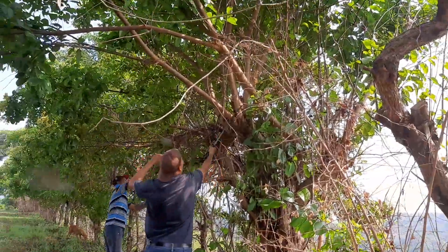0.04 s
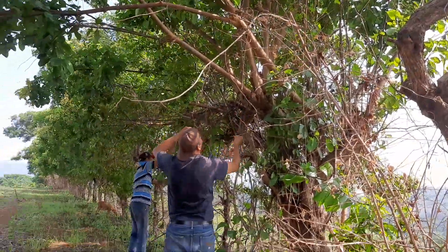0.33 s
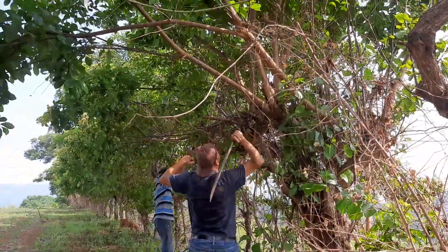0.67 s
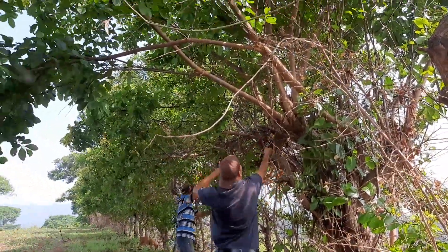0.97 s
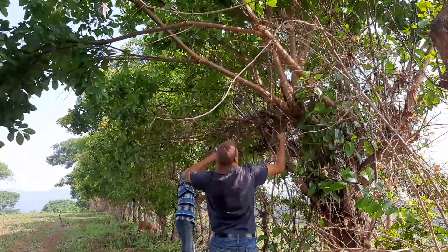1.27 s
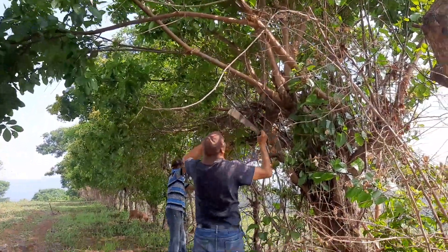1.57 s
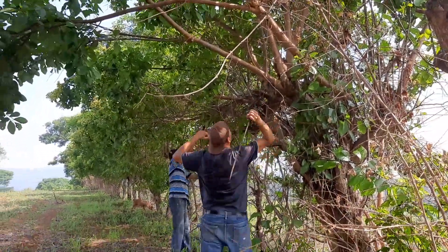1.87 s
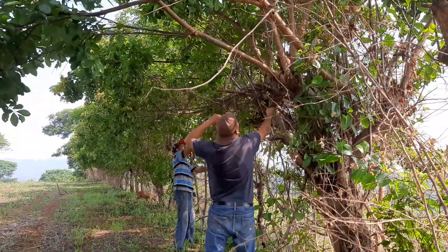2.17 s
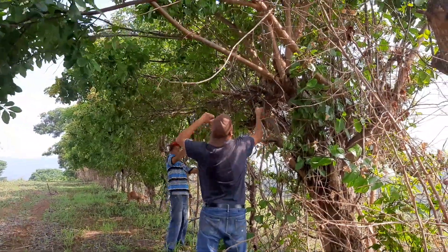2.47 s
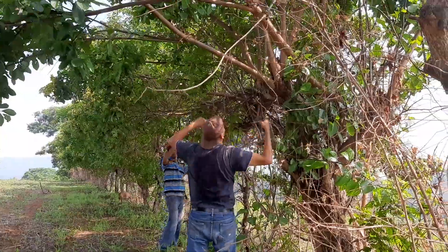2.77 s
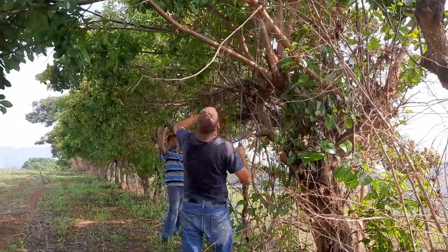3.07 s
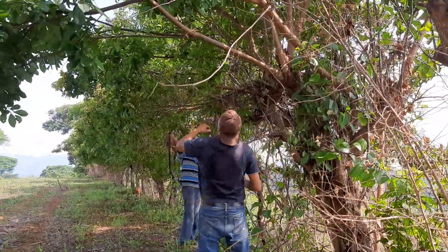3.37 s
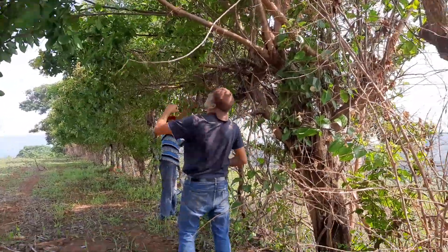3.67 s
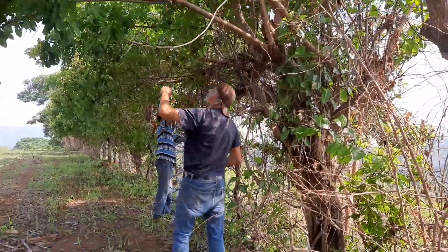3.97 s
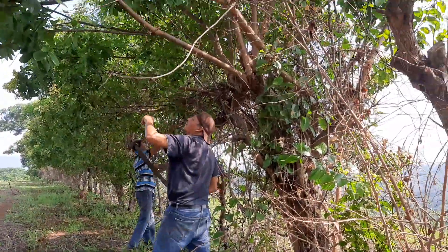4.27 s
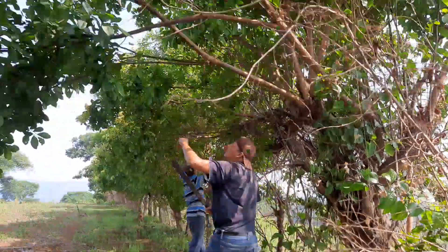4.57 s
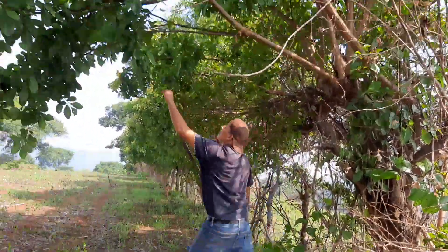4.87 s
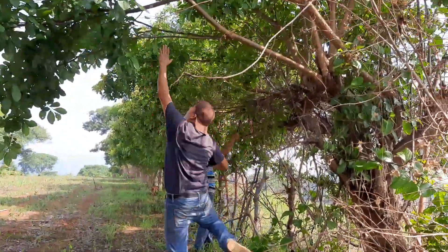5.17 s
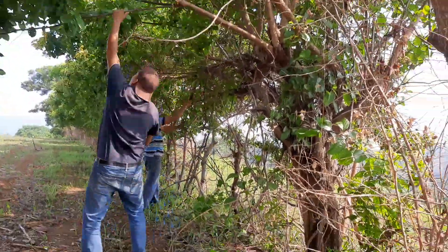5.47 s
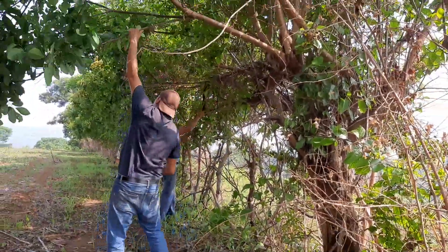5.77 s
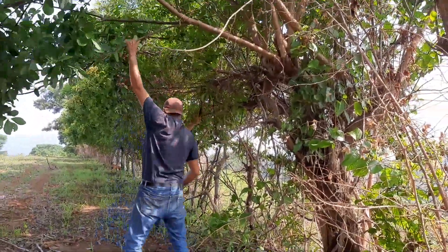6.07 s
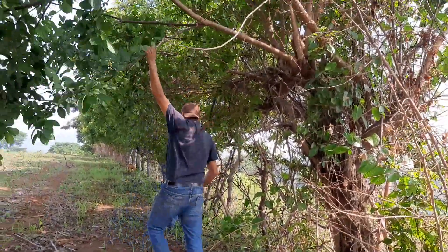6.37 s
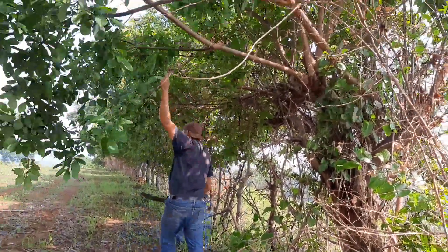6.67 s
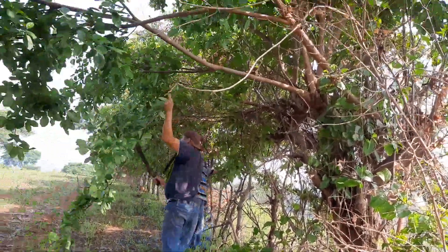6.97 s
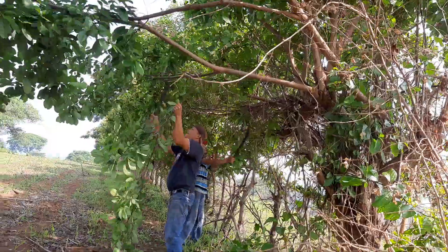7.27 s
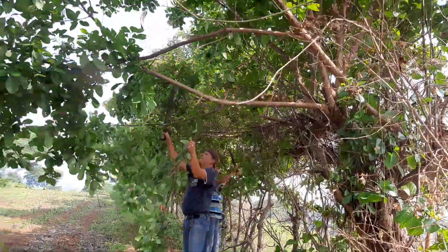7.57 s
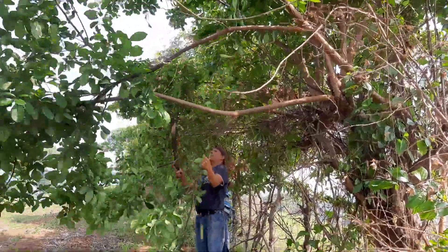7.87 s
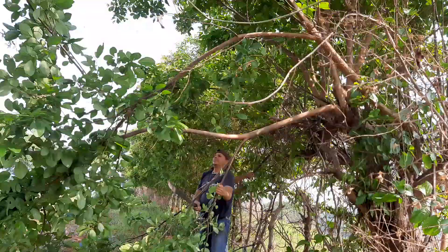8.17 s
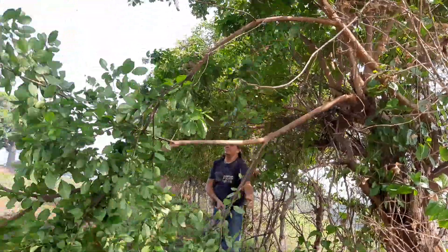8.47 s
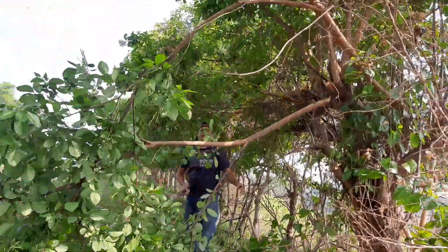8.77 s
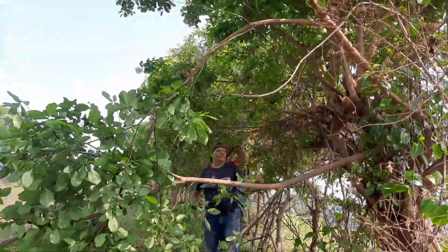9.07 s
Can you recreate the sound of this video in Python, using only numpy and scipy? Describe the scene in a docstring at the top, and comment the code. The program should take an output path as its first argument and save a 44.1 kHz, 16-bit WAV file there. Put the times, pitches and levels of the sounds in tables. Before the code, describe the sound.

A machete chops a leafy tree limb, which cracks loudly as it is pulled down amid rustling leaves and snapping twigs.

```python
"""A machete hacks a leafy limb off a tree, a few metres away, on a calm day.
Each bite splits green fibres and rings the limb and the steel. Green wood creaks; a soft crunch, as of
a step on dry litter, and a faint knock come before the limb is pulled down in a few loud cracks.
Leaves rustle by tapping one another and twigs snap throughout; light wind and a few handling knocks
reach the microphone."""
import sys
import numpy as np
from scipy import signal
from scipy.fft import rfft, irfft
from scipy.io import wavfile

SR = 44100
rng = np.random.default_rng(int(sys.argv[2]) if len(sys.argv) > 2 else 0)


def master(y):
    """Save y as 16-bit WAV."""
    cut = np.clip(np.atleast_2d(y).T, -1, 1)
    pcm = np.round(cut * 32767)  # scale
    wavfile.write(sys.argv[1], SR, pcm.astype(np.int16))


N = 407249
T = np.arange(N) / SR
AGE_S = T[:SR // 2]   # time since a contact


def from_db(db):
    """Decibels to gain."""
    return 10 ** (np.asarray(db) / 20)


def unit_rms(x):
    """Scale to rms 1."""
    return x / np.sqrt(np.mean(x ** 2) + 1e-20)


def curves(rows):
    """Interpolate each column over the times in the first."""
    times_s, *columns = np.transpose(rows)
    return [np.interp(T, times_s, column) for column in columns]


def db_at(spectrum, hz):
    """Read a spectrum on a log-frequency axis."""
    knots_hz, db = np.transpose(spectrum)
    return np.interp(np.log(hz + 1e-3), np.log(knots_hz), db)


def colour(x, *spectra):
    """Minimum-phase filter; the (freq_hz, gain_db) spectra add."""
    size = 4096
    hz = np.fft.rfftfreq(size, 1 / SR)
    cepstrum = irfft(np.log(from_db(sum(db_at(spectrum, hz) for spectrum in spectra))))
    cepstrum[1:size // 2] *= 2
    cepstrum[size // 2 + 1:] = 0
    response = irfft(np.exp(rfft(cepstrum)))
    return signal.fftconvolve(np.atleast_2d(x), response[None], axes=-1)[:, :x.shape[-1]]


def resonance(hz, gain_db, width_ratio):
    """Spectrum with one peak."""
    return [(hz / width_ratio, 0), (hz, gain_db), (hz * width_ratio, 0)]


def drift(rate_hz):
    """Random wavering, rms 1."""
    knots = rng.standard_normal(N // 40)
    return unit_rms(np.interp(T * rate_hz, np.arange(len(knots)), knots))


def panned(x, pan_db):
    """Constant-power pan; pan_db is left minus right."""
    sides = np.array([from_db(pan_db / 2), from_db(-pan_db / 2)]).reshape(2, -1)
    return x * sides / np.sqrt(np.mean(sides ** 2, axis=0))


def add(out, start_s, sound):
    """Mix a sound into out."""
    i = round(start_s * SR)
    out[:, i:i + sound.shape[-1]] += sound[:, :N - i]


def swell(peak_s, db, rise_s, fall_s):
    """Power envelope: Gaussian rise, exponential fall."""
    late_s = T - peak_s
    decay = np.where(late_s < 0, (late_s / rise_s) ** 2, late_s / fall_s)
    return from_db(db) ** 2 * np.exp(-2 * np.minimum(decay, 20))


def grove(x, pan_db, wet_db):
    """Trunks and ground scatter sound back at once; the crowns return a faint, longer wash."""
    early_t60_s, late_db, late_t60_s = .1, -20, .35
    fade = from_db(-60 * AGE_S / early_t60_s) + from_db(late_db - 60 * AGE_S / late_t60_s)
    onset = 1 - np.exp(-(AGE_S / .00059) ** 2)
    mid, side = rng.standard_normal((2, len(AGE_S))) * from_db(wet_db) * fade * onset
    side = colour(side, [(200, -10.5), (900, -5.5), (2500, 6)])   # long waves reach both ports alike
    echo = signal.fftconvolve(np.atleast_2d(x), mid + side * [[1], [-1]], axes=-1)[:, :x.shape[-1]]
    return panned(x + echo, pan_db)


# Limb sway: time_s, relative_hiss_db
SWAY = [(0.0, -46.5), (0.5, -61), (0.8, -52.5), (1.16, -52), (1.67, -54), (2.11, -52.5), (3.3, -57),
        (3.5, -60), (3.85, -58.5), (4.24, -59), (4.81, -49), (5.24, -60), (5.5, -49.5), (5.63, -48),
        (6.35, -50), (6.79, -41), (7.15, -38), (7.62, -43), (7.9, -37), (8.28, -33.5), (8.89, -39.5),
        (9.23, -41)]
# Sprays of leaves brushed or jerked: peak_s, hiss_db, fall_s
BRUSHES = [(0.018, -47.5, .06), (1.24, -47.5, 0.11), (2.284, -48.5, .1), (2.803, -45.5, 0.045),
           (3.192, -49, .11), (3.719, -36.5, .025), (4.813, -37.5, 0.037), (4.885, -45, 0.049),
           (5.25, -47, 0.05), (5.49, -39.5, 0.054), (5.562, -34.5, 0.069), (5.682, -35.5, .14),
           (6.009, -40, 0.071), (6.19, -42.5, 0.04), (6.44, -46, .08), (6.72, -32.5, 0.14),
           (7.235, -31, .06), (8.076, -29.5, 0.033), (8.312, -33.5, 0.22), (8.519, -32.5, 0.073)]


def leaf_level_db():
    """The swaying limb and each brush through the leaves add in power."""
    sway_db, = curves(SWAY)
    brushes = sum(swell(peak_s, db, .79 * fall_s, fall_s) for peak_s, db, fall_s in BRUSHES)
    return 10 * np.log10(from_db(sway_db + 1) ** 2 + brushes)


def contacts(per_s, spread_db):
    """Random taps: many light, few hard; rms 1."""
    sizes = from_db(spread_db * np.minimum(rng.exponential(1, N), 5)) * rng.choice([-1, 1], N)
    return unit_rms(sizes * (rng.random(N) < per_s / SR))


def rustle(spectrum, per_s, near_db, flutter_db):
    """Single leaf taps on either side over a diffuse wash from the crown."""
    taps = np.array([contacts(per_s * from_db(2 * drift(50)), spread_db=2) for side in range(2)])
    wash = rng.standard_normal((2, N))
    return unit_rms(colour(from_db(near_db) * taps + wash, spectrum)) * from_db(flutter_db * drift(70))


def stalks(per_s, q, sizes=14):
    """Stalks knock together, each size ringing briefly at its own pitch; rms 1."""
    ticks = 0
    for hz in np.geomspace(1700, 6800, sizes):
        knocks = contacts(per_s / sizes, spread_db=1) + 1e-18
        ticks = ticks + signal.lfilter(*signal.iirpeak(hz, q, fs=SR), knocks) / np.sqrt(hz)
    ticks = unit_rms(ticks)
    right_lag_s = .00021
    return np.array([ticks, np.roll(ticks, round(right_lag_s * SR))])


# Moving foliage: time_s, relative_pan_db, treble_db, relative_swish_db
FOLIAGE_MIX = [(0.4, 2.5, -3, -14.5), (0.8, 0, 4, -15.5), (4.35, 2.5, 10, -15.5), (4.6, 7, 6, -14.5),
               (6.6, 6, 2.5, -16), (7.1, 0.5, 3.5, -14), (8.15, 4, 6.5, -14.5), (8.7, 8, 3.5, -16)]
# Leaf hiss: freq_hz, density_db
LEAF_SPECTRUM = [(880, -42.5), (1500, -16.5), (2100, -6.5), (2410, -5), (2740, 0.5), (3220, 0),
                 (4460, -5.5), (5940, -4.5), (6890, -7), (8830, -17.5), (12900, -10.5), (15100, -15.5),
                 (16000, -20)]
# Twig swish: freq_hz, density_db
SWISH_SPECTRUM = [(70, -26.5), (150, -7.5), (300, -0.5), (600, -3), (850, -2.5), (1600, -5), (2200, -7),
                  (3200, -21)]


def foliage(hiss_db):
    """Leaves hiss, twigs swish, stalks tick; harder shaking brings more contacts."""
    pan_db, treble_db, swish_db = curves(FOLIAGE_MIX)
    per_s = 7000 * from_db(.7 * (hiss_db - hiss_db.max()))
    hiss = rustle(LEAF_SPECTRUM, per_s, near_db=-7, flutter_db=1.5)
    treble = signal.sosfilt(signal.butter(1, 8000, "high", fs=SR, output="sos"), hiss)
    ticks = from_db(-11) * stalks(per_s=110, q=8)
    hiss = hiss + (from_db(treble_db) - 1) * treble + ticks
    swish = rustle(SWISH_SPECTRUM, per_s, near_db=-5, flutter_db=2)
    swish = .5 * swish + 1.466 * swish[::-1]   # both ports share longer waves
    return from_db(hiss_db) * (panned(hiss, pan_db - 3) + from_db(swish_db) * swish)


# Snapping thin wood: freq_hz, density_db
TWIG_SPECTRUM = [(100, -23.5), (500, -18.5), (1200, -6), (2000, -4.5), (3000, 1), (6500, -2), (9000, -10.5),
                 (12500, -4), (16000, -7.5)]


def twiglets(hiss_db):
    """Tiny twigs snap at random, louder as the foliage moves harder."""
    snaps = colour(contacts(per_s=16, spread_db=2.5), TWIG_SPECTRUM)
    return from_db(hiss_db - 13) * unit_rms(grove(snaps, pan_db=5, wet_db=-35))


# Wind on the microphone: freq_hz, density_db
RUMBLE_SPECTRUM = [(25, -53.5), (50, -9), (90, 1.5), (130, -8), (200, -19), (1500, -81)]
# Soft buffets: peak_s, level_db
BUFFETS = [(0.18, -49), (0.64, -49), (6.69, -45), (8.23, -46)]


def wind(hiss_db, calm_db=-68, draught_db=-23):
    """Lumpy rumble from light air, the limb's draught and single buffets."""
    buffets = sum(swell(peak_s, db, rise_s=.032, fall_s=.059) for peak_s, db in BUFFETS)
    level = np.sqrt(from_db(calm_db) ** 2 + from_db(hiss_db + draught_db) ** 2 + buffets)
    lumps = from_db(3 * drift(20))
    air = rng.standard_normal(N) + .67 * rng.standard_normal((2, N))   # shared plus per port
    return level * lumps * unit_rms(colour(air, RUMBLE_SPECTRUM))


def crackle(decay_s, spread_db, rise_s):
    """A dying run of uneven clicks, as of breaking fibres; energy 1."""
    n = len(AGE_S)
    sizes = from_db(spread_db * np.repeat(rng.standard_normal(n), 16)[:n].clip(-2, 2))
    envelope = np.exp(-AGE_S / decay_s) * (1 - np.exp(-AGE_S / rise_s))
    run = rng.standard_normal(n) * sizes * envelope
    return run / np.sqrt(np.sum(run ** 2))


# Twig snaps: start_s, relative_level_db, relative_pan_db, splinter_re_snap_db, pitch_hz
TWIG_SNAPS = [(0.038, -14, 8, -23.5, 6240), (1.399, -17.5, 6, -17, 3340), (2.416, -28, 3, 8.5, 6100),
              (2.761, -22, 18, -6, 2700), (2.778, -17, 13, 0, 2300), (3.356, -19.5, 10, -7, 3200),
              (3.508, -28, 13, -5.5, 2800), (3.522, -28.5, 6, 6.5, 6000), (3.683, -28.5, 5, 16, 6800),
              (3.71, -20, -21, 11, 3500), (5.544, -14, 3, -11, 6000), (5.973, -22, 14, -2, 3000),
              (6.01, -21, 8, -6, 5000), (6.631, -3.5, 10.5, -1, 3240), (7.1945, -6.5, 11, -4, 3900),
              (7.3597, -8, 12, -10, 4200), (9.16, -13, 16, -19, 4000)]


def twigs():
    """Thin wood gives way in one sharp snap; green twigs splinter briefly after it."""
    out = np.zeros((2, N))
    for start_s, level_db, pan_db, splinter_db, pitch_hz in TWIG_SNAPS:
        snap = crackle(decay_s=.0007, spread_db=0, rise_s=.0001)
        splinters = from_db(splinter_db) * crackle(decay_s=.007, spread_db=5, rise_s=.001)
        twig = colour(snap + splinters, TWIG_SPECTRUM, resonance(pitch_hz, gain_db=5, width_ratio=1.56))
        add(out, start_s, grove(from_db(level_db + 9.5) * twig, pan_db - 9, wet_db=-34.5))
    return out


def ring(modes, force, pitch_spread, build_cycles):
    """Damped modes under a force spectrum; pitches shift with the grip, low modes build up later."""
    hz, level_db, t60_s = np.transpose(modes)[:, :, None]
    hz = hz * (1 + pitch_spread * rng.standard_normal(hz.shape))
    swing = np.sin(2 * np.pi * (hz * AGE_S + rng.random(hz.shape)))
    decay = from_db(level_db + db_at(force, hz) - 60 * AGE_S / t60_s)
    onset = 1 - np.exp(-(AGE_S * hz / build_cycles) ** 2)
    return np.sum(decay * swing * onset, axis=0)


def shiver(force, t60_s):
    """Jolted leaves hiss for a moment."""
    envelope = from_db(-60 * AGE_S / t60_s) * (1 - np.exp(-AGE_S / .003))
    spectrum = [(100, -2.5), (400, -3), (1200, -8.5), (2000, -4), (2900, -.5), (4300, -5),
                (6800, -3.5), (9000, -8), (12500, 1), (16000, -13.5)]
    return colour(rng.standard_normal((2, len(AGE_S))) * envelope, force, spectrum)


# Splitting fibres: freq_hz, density_db
SPLIT_SPECTRUM = [(35, -32), (100, -1.5), (250, 7.5), (500, 4.5), (1000, 4.5), (1900, 3.5), (2900, 6.5),
                  (4200, 1), (6500, 4), (8000, -4), (9200, -6), (12300, 2.5), (16000, -3.5)]
# Limb modes common to all blows: pitch_hz, relative_level_db, t60_s
LIMB_MODES = [(215, -14, 0.11), (300, -9, .1), (366, -10, .1), (462.8, -10.5, .11), (577, -16, .07),
              (793, -14, 0.064), (923, -16.5, 0.065)]


def split_wood(blow, pan_db):
    """Fibres split, a splinter is flicked, wood thuds and rings, leaves shiver."""
    crack_db, thud_db, knock_db, fizz_db, thud_hz, knock_hz, splinter_hz, splinter_db, split_s = blow
    force_db = crack_db + np.array([thud_db, knock_db, knock_db, 0, 0, fizz_db])
    force = list(zip([420, 620, 1700, 2400, 7500, 10000], force_db))
    first_break = crackle(decay_s=.0015, spread_db=2, rise_s=.0004)
    bite = crackle(split_s, spread_db=4, rise_s=.0012) + .6 * first_break
    splinter_peak = resonance(splinter_hz, gain_db=4, width_ratio=1.25)
    crack = from_db(30.7) * colour(bite, force, SPLIT_SPECTRUM, splinter_peak)
    splinter = ring([(splinter_hz, splinter_db, .025)], force, pitch_spread=.0043, build_cycles=.61)
    # The thud is the main bending mode; its pitch depends on where the wood is hit.
    modes = [(thud_hz, 0, .071), (knock_hz, -3.5, .036), *LIMB_MODES]
    wood = ring(modes, force, pitch_spread=.006, build_cycles=1)
    leaves = panned(from_db(3.5) * shiver(force, t60_s=.34), pan_db)
    return grove(crack + from_db(9.5) * (splinter + wood), pan_db, wet_db=-32) + leaves


def blade(modes, level_db, chatter_db=2.5, chatter_hz=120):
    """Steel rings on after a contact, roughened by chatter against the wood."""
    steel = ring(modes, [(3000, level_db)], pitch_spread=0, build_cycles=3)
    return steel * from_db(chatter_db * drift(chatter_hz)[:len(AGE_S)])


# Machete modes: pitch_hz, relative_level_db, t60_s
BLADE_MODES = [(2869, -6.5, .5), (3100, -1.5, .55), (3618, -8.5, .25)]
# Blade strokes: start_s, crack_db, thud_db, knock_db, fizz_db, thud_hz, knock_hz, splinter_hz,
# splinter_db, split_s, blade_db; crack_db sets the force, other levels are relative to it
CHOPS = [(0.094, -21, -1.5, .5, -7.5, 250, 740, 2550, -7, .0043, -26),
         (0.963, -20, 1, -2, -4.5, 303.7, 893, 2490, 5.5, .01, -20),
         (1.169, -48, -3, 4.5, -5, 340, 1140, 1470, -1, 0.029, -20),
         (1.194, -30.5, -13.5, -14, -7, 345, 960, 2780, -7, 0.013, -21),
         (2.0885, -19, 1, 1, -3, 364, 915, 2700, -3, 0.0048, -16),
         (2.338, -46, -3.5, 2, 2, 399, 910, 1600, -8, .0066, -20),
         (2.602, -50, 6, 1.5, 2.5, 358, 880, 1504, 0, 0.008, -20),
         (3.7186, -17, -5.5, 2, -3, 283, 1520, 3080, 3, 0.0053, -24)]


def chops(pan_db=-1.2):
    """The blade bites into green wood or is worked loose."""
    out = np.zeros((2, N))
    for start_s, *blow, blade_db in CHOPS:
        wood = split_wood(blow, pan_db)
        steel = blade(BLADE_MODES, blow[0] + blade_db)
        add(out, start_s, wood + panned(steel, pan_db))
    return out


# Finger knocks: start_s, relative_tick_db, thump_db, thump_hz, pan_db
KNOCKS = [(0.646, -38, -32, 109, -18), (0.834, -27.5, -41, 137, -12), (3.959, -22, -42, 159, -21),
          (4.407, -23, -37, 200, -25), (4.4193, -19, -19.5, 146, -20), (4.4398, -29, -15.5, 106, -17)]


def handling():
    """A finger on the microphone casing gives a dry tick, a low thump and a short rub."""
    tick_spectrum = [(600, 6), (1500, 10), (4500, 15), (9000, -5)]
    rub_spectrum = [(40, -29), (90, 13), (300, 35), (700, 28.5), (8000, 2)]
    out = np.zeros((2, N))
    for start_s, tick_db, thump_db, thump_hz, pan_db in KNOCKS:
        tick = colour(crackle(decay_s=.00087, spread_db=5, rise_s=.0001), tick_spectrum)
        thump = np.sin(2 * np.pi * thump_hz * AGE_S) * np.exp(-AGE_S / .0088)
        rub = colour(crackle(decay_s=.0066, spread_db=14, rise_s=.000078), rub_spectrum)
        knock = from_db(tick_db + 11) * tick + from_db(thump_db) * (thump + rub)
        add(out, start_s, panned(knock, pan_db))
    return out


# A squeak at 2.235 s as the blade is worked loose, green wood creaks, and one short faint knock at 7.045 s:
# start_s, length_s, level_db, pitch_hz
CREAKS_AND_KNOCK = [(2.235, 0.066, -55, 680), (3.385, 0.03, -48, 2350), (4.725, 0.018, -52, 1900),
                    (7.045, .012, -37.5, 950), (8.491, .05, -44, 1160)]


def creaks_and_knock(pulses_per_s=420):
    """Uneven pulses ring one resonance: stick-slip creaks, and one run so short it is a knock."""
    out = np.zeros((2, N))
    for start_s, length_s, level_db, pitch_hz in CREAKS_AND_KNOCK:
        cycles = np.cumsum(pulses_per_s * from_db(3 * drift(300)[:len(AGE_S)])) / SR
        pulses = np.diff(np.floor(cycles), prepend=0)
        tone = unit_rms(signal.lfilter(*signal.iirpeak(pitch_hz, Q=5, fs=SR), pulses))
        envelope = np.sqrt(np.abs(np.sin(np.pi * np.minimum(AGE_S / length_s, 1))))
        add(out, start_s, grove(from_db(level_db) * tone * envelope, pan_db=2.5, wet_db=-34.5))
    return out


# Grazed blade modes: pitch_hz, level_db, t60_s
GRAZE_MODES = [(3505, -30.5, .07), (4084, -31.5, .11), (7000, -39.5, .04)]


def graze(start_s=3.6825):
    """The blade clinks against a twig on its way in."""
    out = np.zeros((2, N))
    add(out, start_s, grove(blade(GRAZE_MODES, level_db=0), pan_db=1, wet_db=-37))
    return out


# Soft crunch (first two rows), then limb cracks and knocks; levels as in CHOPS:
# start_s, crack_db, thud_db, knock_db, fizz_db, thud_hz, knock_hz, splinter_hz, splinter_db, split_s
CRUNCH_AND_CRACKS = [(5.472, -48, -1, 5, -1, 328, 764, 1040, 5, 0.0066),
                     (5.506, -45.5, 3, 4, -2, 303, 610, 990, 4, 0.012),
                     (7.223, -27, -16, -10, -8, 300, 1430, 2590, 5.5, .0039),
                     (7.2315, -16.5, -12.5, -4, -4.5, 205, 792, 1450, 7, 0.0077),
                     (7.263, -26.5, -15, -13, -4.5, 262, 890, 3990, 6.5, .0054),
                     (7.275, -26, -24, -4, -11, 252, 710, 3050, -4, 0.0054),
                     (7.5395, -29, -12.5, 3, -8, 290, 1350, 2440, 5, 0.0028),
                     (8.0837, -18.5, -13, -7, 1, 201, 1155, 3870, -6, 0.0084),
                     (8.239, -35.5, 0, 2, -7, 296, 860, 1820, -2, 0.002),
                     (9.1995, -26, -26, -7.5, -8.5, 303, 894, 3080, -1, 0.023),
                     (9.2275, -26.5, -10, 0.5, -14, 486, 710, 1400, 4, .0064)]


def crunch_and_cracks():
    """A soft crunch, as of a step on dry litter, then the limb cracks and knocks as it is pulled down."""
    out = np.zeros((2, N))
    for start_s, *blow in CRUNCH_AND_CRACKS:
        add(out, start_s, split_wood(blow, pan_db=-1))
    return out


def scene():
    """Breaking wood, moving foliage, and fingers and wind on the microphone."""
    hiss_db = leaf_level_db()
    events = chops() + graze() + crunch_and_cracks() + twigs() + creaks_and_knock()
    return events + foliage(hiss_db) + twiglets(hiss_db) + handling() + wind(hiss_db)


# Microphone port mismatch: freq_hz, left_minus_right_db
PORT_MISMATCH = [(100, 4.5), (380, 0), (800, 4.5), (1300, 2), (2400, 8.5), (4400, 7), (8100, -2),
                 (15000, 1)]


def record(dry, low_cut_hz=37, high_cut_hz=16000):
    """Port colour, low cut, soft clipping, high cut."""
    sides = [colour(x, np.array(PORT_MISMATCH) * [1, share])[0] for x, share in zip(dry, (.5, -.5))]
    sides = signal.sosfilt(signal.butter(2, low_cut_hz, "high", fs=SR, output="sos"), sides)
    rounded = .96 * np.tanh(sides / 1.311)
    return signal.sosfilt(signal.ellip(10, .2, 80, high_cut_hz, fs=SR, output="sos"), rounded)


dry = scene()
out = record(dry)
master(out)
```